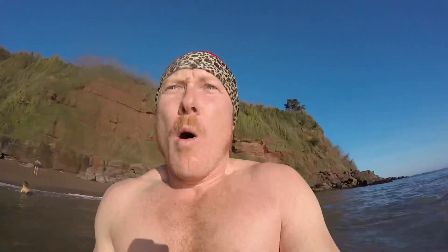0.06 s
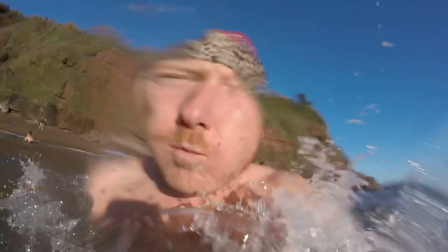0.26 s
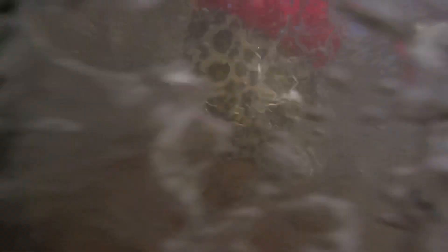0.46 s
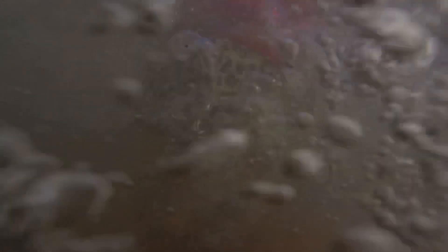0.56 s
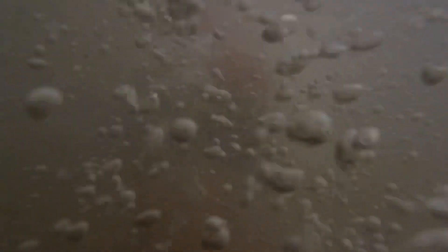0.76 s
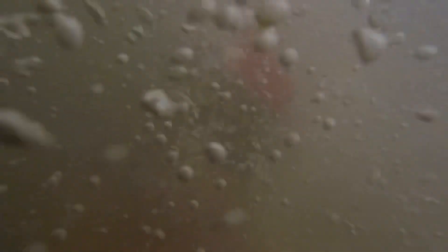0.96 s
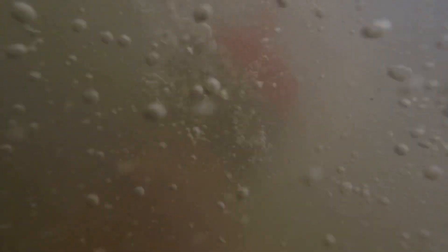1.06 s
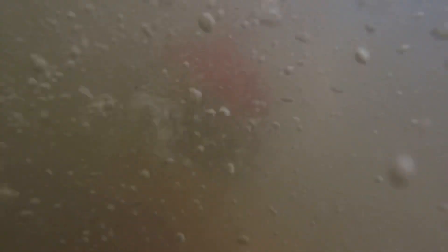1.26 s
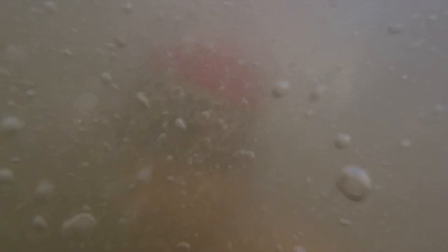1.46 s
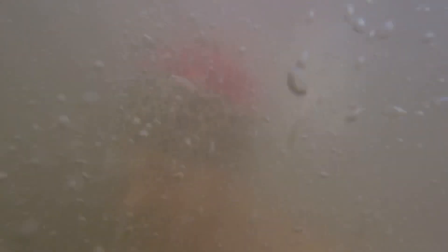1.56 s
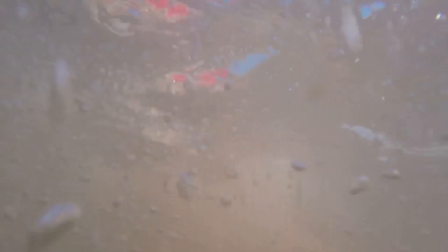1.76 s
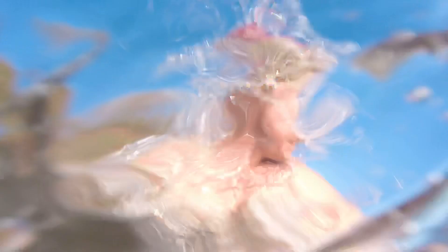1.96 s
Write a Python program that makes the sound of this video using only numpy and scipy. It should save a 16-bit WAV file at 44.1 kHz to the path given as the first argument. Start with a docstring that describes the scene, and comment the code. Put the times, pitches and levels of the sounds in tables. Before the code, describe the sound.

Water splashes and gurgles around a waterproof camera dipped in the sea: low wind buffeting and light spray, a hard slap of water, muffled underwater bubbling, then bright dripping plops as it surfaces; very close microphone.

```python
"""Camera dipped in the sea

Wind rumbles and spray patters on a waterproof camera; it is plunged in and lifted out again.
Water slaps the housing in damped thuds with noise cracks, then air pockets glug as rising sines, treble dulled.
Random bubble swarms plus noise make spray, fizz and churn; filtered noise makes the low buffeting.
Near the surface, short high rings with noise ticks crowd together and the droplets return."""
import sys
import numpy as np
from scipy import signal
from scipy.fft import rfft, irfft
from scipy.io import wavfile
from scipy.ndimage import uniform_filter1d

SR = 44100
rng = np.random.default_rng(int(sys.argv[2]) if len(sys.argv) > 2 else 0)


def wrap_up_sound(samples):
    """Save the sound to the file named by the first command line argument, as 16-bit audio."""
    columns = np.atleast_2d(samples).T
    # keep every value between -1 and 1, then stretch to whole-number steps
    tamed = np.clip(columns, -1, 1)
    steps = np.round(tamed * 32767).astype(np.int16)
    wavfile.write(sys.argv[1], SR, steps)


N = 88993
PLUNGE_S, SUBMERGED_S, SURFACES_S, CROSSING_S = 0.44, 0.59, 1.88, 0.03
BUBBLE_SWELL_CYCLES, POP_SWELL_CYCLES, TICK_SWELL_CYCLES = 1.71, 1, 1.7
BUBBLE_GLIDE, POP_GLIDE = 0.067, 0.017  # mean pitch rise over a ring, as a share


def undb(db):
    """Decibels to gain."""
    return 10 ** (np.asarray(db) / 20)


def curve(rows):
    """Gain over time, interpolated in dB between (s, dB) points."""
    seconds, db = np.array(rows).T
    return undb(np.interp(np.arange(N) / SR, seconds, db))


def after(at_s):
    """Linear fade from 0 to 1 centred on a time, as the waterline crosses the microphone."""
    return np.clip((np.arange(N) / SR - at_s) / CROSSING_S + 0.5, 0, 1)


def noise():
    """White noise, rms 1."""
    return rng.standard_normal(N)


def colour(x, points):
    """Minimum-phase filter through (Hz, dB) points; rms 1."""
    hz, db = np.array(points).T
    bin_hz = np.arange(N + 1) * SR / (2 * N)
    log_gain = np.log(undb(np.interp(np.log(bin_hz + 1), np.log(hz), db)))
    # Folding the cepstrum forward in time makes the filter causal
    cepstrum = irfft(log_gain)
    cepstrum[1:N] *= 2
    cepstrum[N + 1:] = 0
    response = np.exp(rfft(cepstrum))
    y = irfft(rfft(np.tile(x, 2)) * response)[:N]
    return y / y.std()


def even(x, window_s):
    """Divides out the slow swells of a texture, so that its level curve rules."""
    size = int(window_s * SR)
    power = uniform_filter1d(uniform_filter1d(x ** 2, size), size)
    return x / np.sqrt(power + 1e-12)


def cut(x, hz, kind):
    """Fourth-order low-pass or high-pass."""
    return signal.sosfilt(signal.butter(4, hz, kind, fs=SR, output="sos"), x)


def add(out, at_s, x):
    """Mixes a short sound in at a time."""
    i = max(int(at_s * SR), 0)
    out[i:i + len(x)] += x[:max(N - i, 0)]


def ring(hz, decay_cycles, swell_cycles, glide):
    """A bubble: a sine that swells, then decays exponentially while its pitch creeps up."""
    length_cycles = swell_cycles + 6 * decay_cycles
    cycles = np.arange(int(length_cycles * SR / hz) + 2) * hz / SR
    swell = np.sin(np.pi / 2 * np.minimum(cycles / swell_cycles, 1)) ** 2
    decay = np.exp(-np.maximum(cycles - swell_cycles, 0) / decay_cycles)
    phase_cycles = cycles * (1 + glide * cycles / cycles[-1])
    return swell * decay * np.sin(2 * np.pi * phase_cycles)


def cloud(per_s, lo_hz, hi_hz, spread_db, decay_cycles):
    """A swarm of random bubbles, most weak and a few strong; rms 1."""
    out = np.zeros(N)
    for when, pitch, size, length in rng.random((int(per_s * N / SR), 4)):
        hz = min(lo_hz * (hi_hz / lo_hz) ** pitch, SR / 2)
        strength = undb(-spread_db * np.log(size + 0.036)) * np.sqrt(hz)
        bubble = ring(hz, decay_cycles * (0.5 + length), BUBBLE_SWELL_CYCLES, BUBBLE_GLIDE)
        add(out, when * N / SR, strength * bubble)
    return out / out.std()


def crack(source, decay_s):
    """A random cut of noise under an exponential decay."""
    count = 2000
    i = rng.integers(N - count)
    return source[i:i + count] * np.exp(-np.arange(count) / SR / decay_s)


def rumble(hz, slope_db):
    """Noise peaking at one low pitch: levels off an octave below, falls steadily per octave above."""
    top_db = slope_db * np.log2(SR / 2 / hz)
    return colour(noise(), [(hz / 2, slope_db), (hz, 0), (SR / 2, top_db)])


# Low buffeting by wind and moving water. Each row: time in seconds, level in dB.
BUFFET_LEVEL = [(0, -18.5), (.15, -5.5), (.205, -21.5), (.26, -3.5), (.45, -10.5), (.6, -27), (.88, -25.5),
                (1.0, -18.5), (1.42, -21.5), (1.59, -7.5), (1.7, -16), (2.02, -7.5)]
WIND_HZ, SWAY_HZ, BUFFET_DB_PER_OCTAVE = 16.92, 13.1, -13.5
FLUTTER_DB, FLUTTER_HZ, FLUTTER_DB_PER_OCTAVE = -25, 65, -8.5


def buffet(under):
    """Wind rumbles, with eddies fluttering at the peaks of its swing; under water pressure sways slower."""
    wind = even(rumble(WIND_HZ, BUFFET_DB_PER_OCTAVE), 0.058)
    sway = even(rumble(SWAY_HZ, BUFFET_DB_PER_OCTAVE), 0.058)
    flutter = undb(FLUTTER_DB) * wind ** 2 * rumble(FLUTTER_HZ, FLUTTER_DB_PER_OCTAVE)
    return curve(BUFFET_LEVEL) * ((1 - under) * (wind + flutter) + under * sway)


# Churning water. Each row: time in seconds, level in dB.
CHURN_LEVEL = [(0, -57), (.42, -44), (.48, -23), (.56, -23), (.6, -31), (.72, -29), (.92, -26),
               (1.0, -29.5), (1.14, -25.5), (1.26, -27.5), (1.47, -30.5), (1.58, -24.5), (1.68, -28),
               (1.8, -25), (1.92, -36.5), (2.02, -34)]
# Its spectrum. Each row: frequency in Hz, gain in dB.
CHURN_SPECTRUM = [(40, -0.5), (135, -4.5), (190, -8), (290, 0.5), (450, -5), (680, -6.5), (1100, -23.5),
                  (1500, -44), (16000, -100)]
CHURN_PER_S, CHURN_SPREAD_DB, CHURN_CYCLES, WASH_DB = 600, 1.4, 5, -9  # wash against bubbles


def churn():
    """Many muffled bubbles gurgle over a soft noise wash."""
    swarm = cloud(CHURN_PER_S, 109.6, 1390.5, CHURN_SPREAD_DB, CHURN_CYCLES)
    swarm = swarm + undb(WASH_DB) * noise()
    return curve(CHURN_LEVEL) * even(colour(swarm, CHURN_SPECTRUM), 0.11)


# Fine spray and fizz. Each row: time in seconds, level in dB.
SPRAY_LEVEL = [(0, -43.5), (.18, -49), (.26, -35), (.33, -44), (.42, -42.5), (.475, -25), (.515, -33),
               (.56, -30.5), (.59, -36.5), (.72, -41.5), (.78, -57.5), (.95, -56.5), (1.1, -63.5),
               (1.4, -56.5), (1.6, -46), (1.79, -46.5), (1.89, -34.5), (1.955, -47), (2.02, -28.5)]
# Spray spectrum in air, also of the slap cracks. Each row: frequency in Hz, gain in dB.
SPRAY_SPECTRUM = [(800, -8), (1400, -4.5), (2100, -4.5), (2700, 2), (4000, -7.5), (6000, -9), (8000, -21),
                  (9200, -23), (16000, -35)]
# Fizz spectrum in water. Each row: frequency in Hz, gain in dB.
FIZZ_SPECTRUM = [(300, -8.5), (1000, -0.5), (1500, -4.5), (2300, -2), (3500, -11), (6000, -21), (8000, -26),
                 (16000, -41.5)]
DROPS_PER_S, DROP_SPREAD_DB, DROP_CYCLES, HISS_DB = 1800, 4.3, 4.5, -6.5  # hiss against droplets
FIZZ_PER_S, FIZZ_SPREAD_DB, FIZZ_CYCLES, FIZZ_HISS_DB = 450, 4.3, 5, -3.5
SURF_DB = 0.5  # shore hiss added before the plunge, against droplets


def spray(under):
    """Shore hiss, ringing droplets from the plunge, duller fizz in the water, droplets at the surface."""
    hiss = undb(HISS_DB) + undb(SURF_DB) * (1 - after(PLUNGE_S))
    drops = cloud(DROPS_PER_S, 690, 14300, DROP_SPREAD_DB, DROP_CYCLES)
    drops = (drops + hiss * noise()) / np.hypot(1, hiss)
    fizz = cloud(FIZZ_PER_S, 900, 12000, FIZZ_SPREAD_DB, FIZZ_CYCLES)
    fizz = fizz + undb(FIZZ_HISS_DB) * noise()
    deep = under * (1 - after(SURFACES_S))
    texture = (1 - deep) * colour(drops, SPRAY_SPECTRUM) + deep * colour(fizz, FIZZ_SPECTRUM)
    return curve(SPRAY_LEVEL) * even(texture, 0.099)


# Tiniest bubbles, right at the microphone. Each row: start in seconds, level in dB.
TINY_BUBBLES = [(0.691, -28), (1.557, -38), (1.729, -44.5)]
TICK_HZ, TICK_CYCLES = 11530, 5.6


def ticks():
    """The smallest bubbles give a thin, very high snap."""
    out = np.zeros(N)
    for at_s, db in TINY_BUBBLES:
        add(out, at_s, undb(db) * ring(TICK_HZ, TICK_CYCLES, TICK_SWELL_CYCLES, POP_GLIDE))
    return out


# Water slapping the housing. Each row: start in seconds, thud pitch in Hz, thud in dB, crack in dB.
HOUSING_SLAPS = [(.121, 284, -17.5, -31), (0.4958, 750, -1.5, -37), (0.5317, 342, -1, -27),
                 (0.5497, 530, -1, -18.5), (0.56, 85, -8.5, -48.5), (0.5647, 201, 1.5, -23.5),
                 (1.026, 135, -10, -61.5)]
SLAP_CYCLES, SLAP_RISE_CYCLES, CRACK_S = 0.53, 0.52, 0.0017


def slaps():
    """Water closes over the housing in heavily damped thuds, each with a crack of spray."""
    out = np.zeros(N)
    wet = colour(noise(), SPRAY_SPECTRUM)
    for at_s, hz, thud_db, crack_db in HOUSING_SLAPS:
        # Inverted: the thud swings negative first
        add(out, at_s, -undb(thud_db) * ring(hz, SLAP_CYCLES, SLAP_RISE_CYCLES, 0))
        add(out, at_s, undb(crack_db) * crack(wet, CRACK_S))
    return out


# Drops and small bubbles bursting on the housing.
# Each row: start in seconds, pitch in Hz, level in dB, decay in cycles.
BURSTS = [(0.3577, 2840, -24.5, 7), (.416, 6700, -20, 4), (0.4338, 9000, -14, 6.2),
          (0.4342, 3600, -4, 0.79), (0.437, 2460, -16.5, 3.9), (0.44, 1400, -12.5, 1.6),
          (0.463, 5530, -13, 5.2), (0.4745, 1560, -17, 1.6), (0.4906, 5750, -19.5, 8.3),
          (0.5018, 7200, -25, 12), (0.552, 5040, -20, 16), (0.55, 1560, -11, 2.3), (0.6737, 2750, -19, 1.7),
          (0.6897, 3130, -24.5, 3.6), (0.7007, 3400, -42, 3.3), (0.72, 2040, -20.5, 5.7),
          (0.73, 3750, -30, 7.4), (0.756, 5900, -39, 5.6), (0.8596, 1220, -21.5, 5.1),
          (1.46, 4100, -30.5, 1.23), (1.488, 3390, -36, 4.9), (1.532, 4330, -26, 1.4),
          (1.5673, 1960, -13.5, 2.7), (1.5679, 5700, -31.5, 8.9), (1.59, 5160, -28.5, 5.7),
          (1.606, 3220, -31, 12), (1.638, 5330, -35.5, 9.4), (1.663, 1970, -23.5, 7),
          (1.715, 2920, -36, 8.2), (1.735, 2790, -18.5, 4.5), (1.7418, 2347, -21.5, 12),
          (1.8135, 1560, -12, 0.77), (1.826, 2770, -18.5, 2), (1.84, 1450, -15, 2.2),
          (1.8482, 3540, -31, 7.8), (1.8616, 2610, -22.5, 9.4), (1.8739, 4870, -25.5, 8.2),
          (1.879, 1950, -18.5, 13), (1.8937, 2160, -12, 3.8), (1.901, 3620, -19, 9), (1.905, 1770, -9, 2.4),
          (1.915, 2235, -6.5, 6.2), (1.9343, 2500, -8.5, 8.2), (1.9534, 1970, -22, 1.5),
          (1.9755, 3760, -15, 5.2), (1.9882, 1800, -5.5, 2.15), (2.005, 2340, -11.5, 1.4)]
POP_TICK_DB, POP_TICK_S = -16, 0.004  # splash against the tone of its burst


def pops():
    """Each burst is a brief high ring with a wet noise tick around its own pitch."""
    out, white = np.zeros(N), noise()
    for at_s, hz, db, decay_cycles in BURSTS:
        band_hz = [hz / 2, min(hz * np.sqrt(2), SR / np.e)]
        wet = signal.sosfilt(signal.butter(2, band_hz, "band", fs=SR, output="sos"), white)
        add(out, at_s, undb(db) * ring(hz, decay_cycles, POP_SWELL_CYCLES, POP_GLIDE))
        add(out, at_s, undb(db + POP_TICK_DB) * crack(wet / wet.std(), POP_TICK_S))
    return out


# Air pockets that break loose and ring.
# Each row: start in seconds, pitch in Hz, level in dB, decay in cycles.
AIR_POCKETS = [(.472, 993, -9.5, 2.2), (.478, 920, -12, 10), (.478, 750, -6, 5.2), (.5015, 977, -9.5, 2.7),
               (.628, 241.4, -19, 10), (.717, 259.5, -14.5, 2.5), (.868, 308, -17.5, 3.7),
               (.9145, 325, -7.5, 1.46), (.934, 383, -11, 0.73), (.968, 308.5, -16, 2.3),
               (.988, 703, -31.5, 12), (1.035, 336.4, -7.5, 3.7), (1.055, 923, -30.5, 13),
               (1.1, 583, -24.5, 18.5), (1.105, 473, -12.5, 1.2), (1.153, 684, -24, 10.5),
               (1.155, 556, -18.5, 4.1), (1.164, 299, -11, 3.8), (1.186, 280.5, -15, 6.8),
               (1.193, 529, -19.5, 5), (1.204, 458, -19, 2.4), (1.318, 576, -22, 3.9),
               (1.351, 355, -15, 3.4), (1.354, 580, -20, 4.2), (1.377, 315, -17.5, 3.9),
               (1.397, 584, -22.5, 10.4), (1.441, 888, -25.5, 7.6), (1.495, 239, -14.5, 2.5),
               (1.509, 416, -8.5, 3.4), (1.523, 472.5, -10.5, 4.3), (1.586, 300, -14, 0.35),
               (1.634, 405, -14, 5.4), (1.755, 686, -17.5, 27.4), (1.771, 595.7, -14, 14.5),
               (1.7845, 361, -6, 4.9), (1.798, 420, -8.5, 0.38), (1.8125, 656, -10.5, 7.1),
               (1.839, 683, -6, 1.26), (1.853, 729, -17, 11.7), (1.894, 639, -20, 7.3)]


def bubbles():
    """Large air pockets glug close to the housing, each a decaying sine."""
    out = np.zeros(N)
    for at_s, hz, db, decay_cycles in AIR_POCKETS:
        add(out, at_s, undb(db) * ring(hz, decay_cycles, BUBBLE_SWELL_CYCLES, BUBBLE_GLIDE))
    return out


GLUG_TOP_HZ, POP_LOW_HZ, POP_TOP_HZ = 1007, 1360, 7000  # the tops apply once submerged


def muffle(x, top_hz, under):
    """The wet housing takes the treble away as the camera submerges."""
    return (1 - under) * x + under * cut(x, top_hz, "low")


def scene():
    """Sums all the water sounds at one microphone."""
    under = after(SUBMERGED_S)
    glugs = muffle(bubbles(), GLUG_TOP_HZ, under)
    bursts = muffle(cut(pops(), POP_LOW_HZ, "high"), POP_TOP_HZ, under)
    background = buffet(under) + churn() + spray(under)
    return (background + ticks() + slaps() + bursts + glugs)[None]


TOP_HZ = 15800


def record(dry):
    """The camera rounds off peaks towards 0.9 and cuts the top."""
    rounded = dry / (1 + (dry / 0.9) ** 8) ** (1 / 8)
    return signal.sosfilt(signal.ellip(8, 0.2, 70, TOP_HZ, fs=SR, output="sos"), rounded)


dry = scene()
out = record(dry)
wrap_up_sound(out)
```